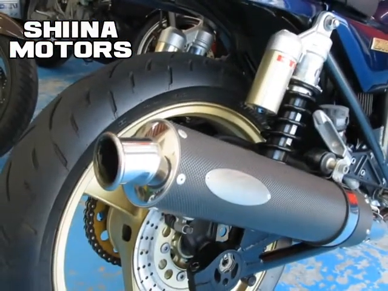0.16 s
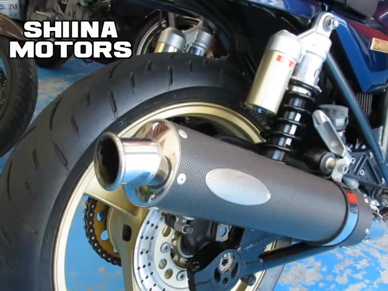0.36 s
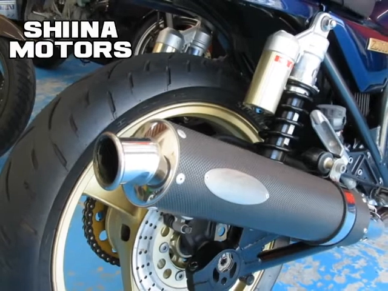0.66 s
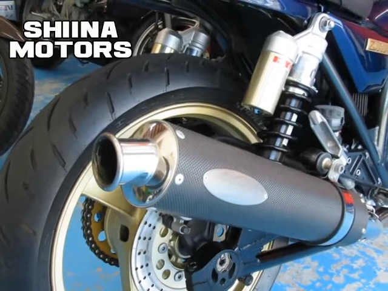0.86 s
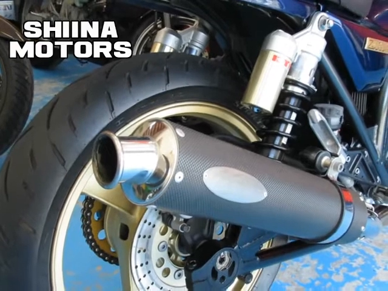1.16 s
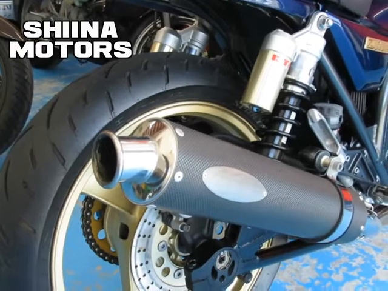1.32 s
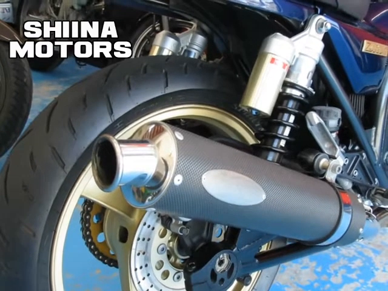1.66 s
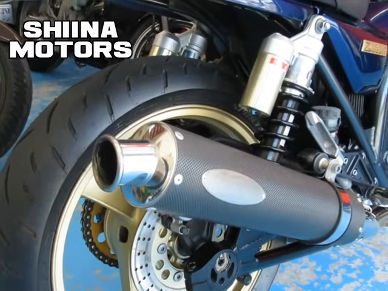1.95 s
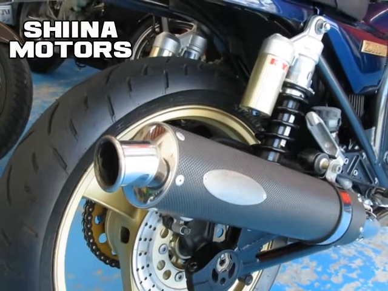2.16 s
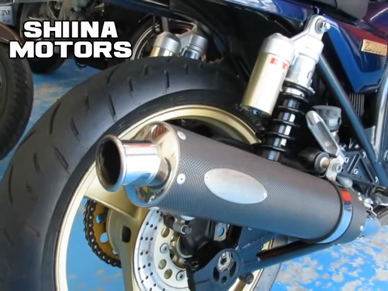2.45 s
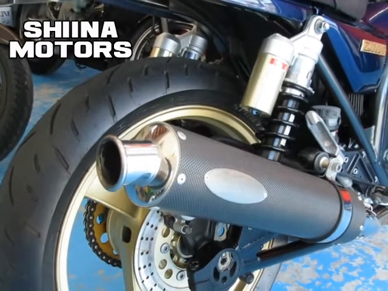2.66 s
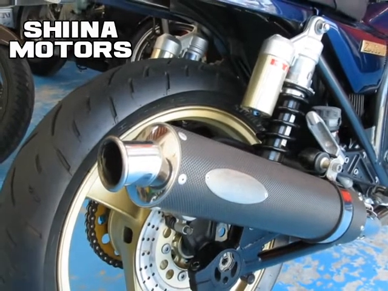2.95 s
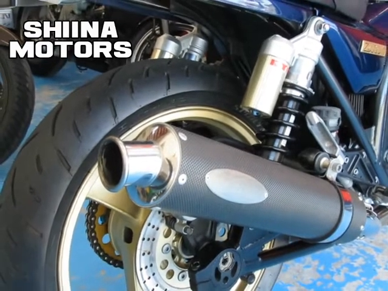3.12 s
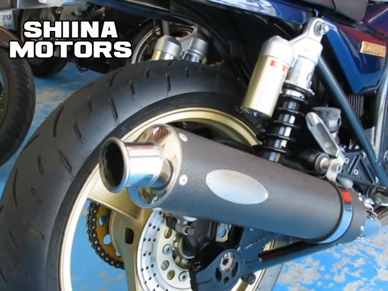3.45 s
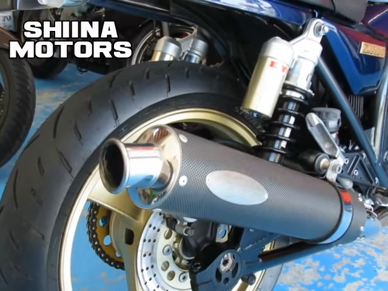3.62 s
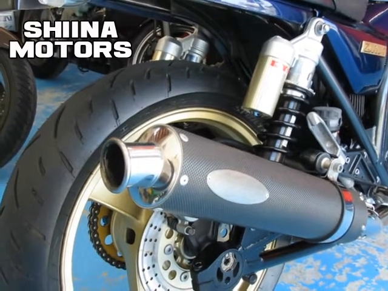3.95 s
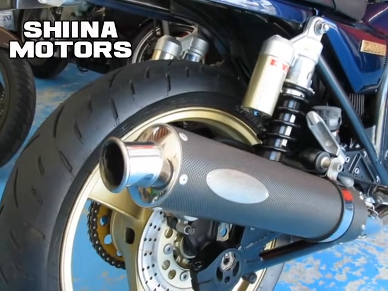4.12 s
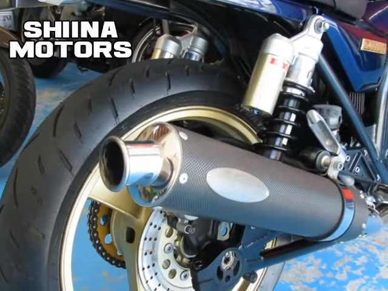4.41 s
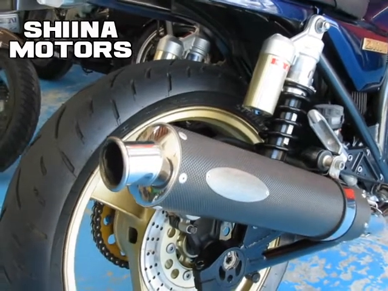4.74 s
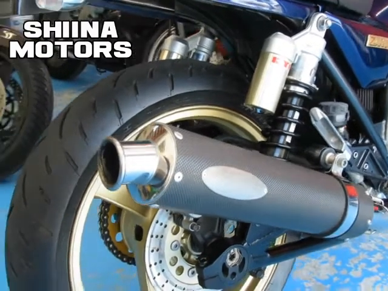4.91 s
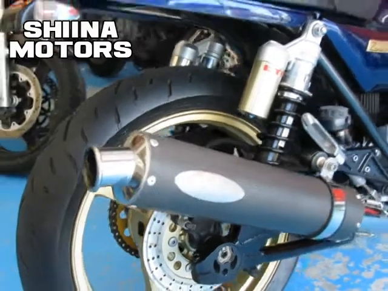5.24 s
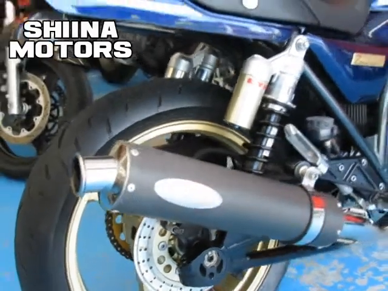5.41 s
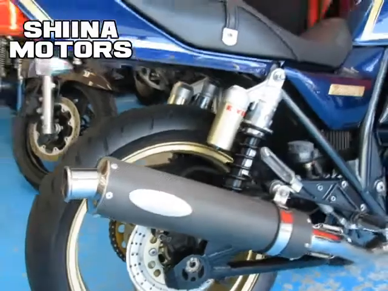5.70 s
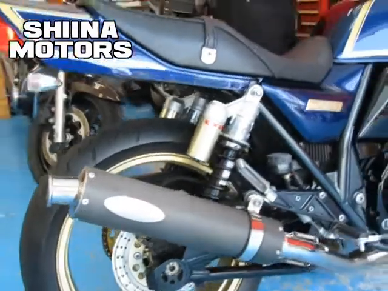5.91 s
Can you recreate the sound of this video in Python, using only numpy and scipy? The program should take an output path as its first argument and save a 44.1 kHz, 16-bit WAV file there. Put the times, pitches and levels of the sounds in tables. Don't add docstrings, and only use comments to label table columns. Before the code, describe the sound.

Close behind a motorcycle's silencer, a dying rev settles into lumpy idle, followed by three raspy revs with crackling pops on the overrun.

```python
import sys
import numpy as np
from scipy import signal
from scipy.fft import rfft, irfft, next_fast_len
from scipy.io import wavfile
from scipy.ndimage import uniform_filter1d, map_coordinates

SR = 44100
rng = np.random.default_rng(int(sys.argv[2]) if len(sys.argv) > 2 else 0)


def transcribe(signal):
    frames = np.atleast_2d(signal).T
    limited = np.clip(frames, -1, 1)
    pcm = np.round(limited * 32767).astype(np.int16)
    wavfile.write(sys.argv[1], SR, pcm)


def decibels_to_gain(level_db):
    exponent = np.asarray(level_db, float) / 20
    return 10 ** exponent


N = 267684

# [t/s, peak level/dB, thud level/dB]
POPS = [
    (1.092, -24, 18),
    (2.949, -27, 14),
    (3.059, -18, -10),
    (4.578, -5, -2),
    (4.797, -25, -11),
    (4.86, -13, 2),
    (4.963, -37, 5),
]
# [f/Hz, width/Hz, level/dB]
PIPE_MODES = [(88.6, 17.2, 11.5), (195, 10, 3), (249, 128, 4.5), (354.4, 65, 0.5)]
# [f/Hz, width/Hz, level/dB]
CAN_MODES = [(683, 111, 1.5), (1131, 101, 5), (1356, 61, 3.5), (1675, 55, -9), (2087, 108, -4.5),
             (2430, 73, -16), (3600, 360, -10.5), (4690, 60, -0.5)]
# [f/Hz, width/Hz, level/dB]
THUD_MODES = [(127, 64, 4)]
# [f/Hz, level/dB per Hz]
SPIT_COLOUR = [(1820, -31), (3100, -21.5), (3650, 2.5), (4290, -19.5), (4710, -6), (5150, -20.5),
               (6790, -12), (7360, -18.5), (7930, -16.5), (8480, -18), (13500, -20.5), (15000, -22),
               (15600, -32)]
# [f/Hz, level/dB per Hz]
HISS_COLOUR = [(310, -2), (520, 3), (732, 1.5), (820, 0), (1170, 1.5), (1620, -4.5), (2630, -4.5),
               (3170, -13), (4520, -14), (7120, -27.5), (12900, -37.5), (14700, -50), (15600, -61)]
# [f/Hz, left-right likeness/0-1]
ALIKE = [(60, 1.0), (150, 1.0), (380, 1.0), (950, 1.0), (2380, 0.97), (5980, 0.8), (15000, 0.5)]
# [f/Hz, left minus right level/dB]
LEAN = [(60, 0.0), (180, 0.0), (550, 0.0), (1650, 0.0), (4970, 0.5), (15000, 0.5)]
# [f/Hz, left's lead/rad]
LEAD = [(40, .005), (100, .02), (300, .02), (700, .02), (1500, .07), (3000, .15), (5600, .6), (10000, .5),
        (15000, .7)]
# [f/Hz, T60/s]
ROOM_DECAY = [(100, 1), (1500, 0.85), (10000, 0.15)]

# [t/s, firing rate f/Hz]
BLIPS = [
    [(0, 100), (.19, 69), (.3, 58)],
    [(.54, 46), (.7, 82), (.8, 116), (.9, 156), (1.0, 189), (1.1, 217), (1.14, 221), (1.26, 187)],
    [(2.43, 46), (2.5, 71), (2.6, 104), (2.66, 134), (2.78, 174), (2.9, 209), (2.95, 213), (3.0, 206)],
    [(4.155, 46), (4.2, 60), (4.3, 92), (4.4, 137), (4.5, 171), (4.6, 198), (4.68, 212), (4.72, 203)],
]
# [opens t/s, shuts t/s, first order drops out t/s]
THROTTLE = [
    (0.51, 1.106, 1.092),
    (2.372, 2.908, 2.92),
    (4.097, 4.628, 4.665),
]
OPEN_S, SHUT_S = 0.13, 0.09
IDLE_HZ, COAST_S = 45.5, .5
LANDING = 8
CATCH_HZ, EVEN_S, IDLE_SCATTER_DB, SETTLE_S = 52, .17, 1.9, 0.9
# [first order level/dB, second order level/dB]
SETTLE_ORDERS_DB = [3.5, 14]
# [thump, bark, spit, hiss level/dB]
SETTLE_GAS_DB = [0.5, 1, 0.5, 6.2]

# [firing rate f/Hz, first order level/dB, second order level/dB]
ORDERS_OPEN = [(46, -25, -20), (65, -27.5, -30.5), (89, -20.5, -29), (113, -17.5, -20), (132, -19.5, -17),
               (186, -33.5, -20.5), (180.6, -21, -14), (216, -30, -24)]
# [firing rate f/Hz, first order level/dB, second order level/dB]
ORDERS_SHUT = [(44.5, -44.5, -36), (53.7, -42.5, -38), (72, -39.5, -48.5), (99, -36.5, -41.5),
               (107, -34.5, -37.5), (130, -35, -42.5), (167, -35, -45.5), (195, -31, -36.5)]
# [firing rate f/Hz, thump, bark, spit, hiss level/dB]
GAS_OPEN = [(45.3, -26.5, -21, -41, -42.5), (70.2, -20, -53, -51, -33.5),
            (81.2, -13.5, -35.5, -50.5, -32.5), (129.5, -10.5, -22, -46, -24.5),
            (163, -20.5, -19, -49, -32), (206, -30, -16, -48, -29.5)]
# [firing rate f/Hz, thump, bark, spit, hiss level/dB]
GAS_SHUT = [(46, -34.5, -59, -72, -47.5), (71.4, -35.5, -59, -73, -46.5), (92.6, -32.5, -50, -74.5, -44.5),
            (124, -33.5, -37, -74, -41), (194, -34, -32, -58.5, -35.5), (232, -49, -35, -55, -26)]
# [firing rate f/Hz, size scatter/dB, turbulence in the bark/0-1]
BURN_OPEN = [(46, 1.5, .75), (110, 1.4, .22), (215, 1.7, .16)]
# [firing rate f/Hz, size scatter/dB, turbulence in the bark/0-1]
BURN_SHUT = [(46, 3.8, .8), (120, 3.6, .85), (210, 2.2, .65)]
# [firing rate f/Hz, loss at 400 Hz/dB]
DULL_OPEN = [(60, 25.5), (125, 12.5), (215, 6)]
# [firing rate f/Hz, loss at 400 Hz/dB]
DULL_SHUT = [(46, 22.8), (55, 22.7), (205, 7.3)]

# [t/s, level/dB]
SURGES = [(.83, 0), (.98, 3), (1.052, 2.5), (1.1, 4), (2.64, 0), (2.72, 3), (2.79, 1.5), (2.84, -0.5),
          (2.91, -0.5), (4.382, -0.5), (4.46, 1.5), (4.532, 3), (4.62, 2.5)]
SURGE_SHARE = [0.85, 1.2, 0.87, 2.4]
# [t/s, level/dB]
MISSES = [(.15, -4), (.22, -5), (.31, 0.5), (.475, -11), (1.45, -1), (1.83, -10), (1.96, -10), (2.065, -9),
          (3.22, 0), (3.36, -5), (3.48, 0), (3.75, -8), (3.865, -2.5), (4.572, -0.5), (5.125, -8),
          (5.25, -4), (5.45, -3), (5.56, -8)]
SURGE_S, MISS_S = 0.012, .015
# [t/s, hiss level/dB, pipe level/dB]
ANGLE = [
    (0, 4, 2.5),
    (.5, 0.08, -0.64),
    (5.3, 0.5, -0.6),
    (5.6, -1.5, -4),
    (6.07, 1.5, -3),
]

DROP_S, DROP_DB = 0.02, -31
STUMBLE_PER_S, STUMBLE_DEPTH = 16, 1.2
DIP_LOW_HZ, DIP_HIGH_HZ, DIP_DB, DIP_LATE_S = 650, 2800, -6, .00017
WALL_S, WALL_HZ, WALL_WIDTH_HZ, WALL_DB = 0.0108, 355, 87, -24
CONTROL_STEP = 64


def unit(x):
    return x / np.sqrt(np.mean(x ** 2) + 1e-20)


def slow_rms(x):
    power = uniform_filter1d(uniform_filter1d(x ** 2, size=4000), size=4000)
    return np.sqrt(np.abs(power) + 1e-20)


def along(points, hz):
    f, v = np.transpose(points)
    return np.interp(np.log(hz + 1), np.log(f + 1), v)


def filtered(x, response):
    m = next_fast_len(N + SR // 2)
    return irfft(rfft(x, m) * response(np.fft.rfftfreq(m, 1 / SR)), m)[..., :N]


def resonances(modes):
    return lambda f: sum(decibels_to_gain(db) * 1j * f * w / (c * c - f * f + 1j * f * w) for c, w, db in modes)


def steep(hz):
    b, a = signal.butter(8, hz, analog=True)
    return lambda f: signal.freqs(b, a, worN=np.ravel(f))[1].reshape(np.shape(f))


def stereo_noise(colour):
    points = [(colour[0][0] / 2, -60)] + colour

    def mid_side(hz):
        turn = np.arccos(np.clip(along(ALIKE, hz), -1, 1)) / 2
        return decibels_to_gain(along(points, hz)) * [np.cos(turn), np.sin(turn)]

    mid, side = filtered(rng.standard_normal((2, N)), mid_side)
    return unit(np.array([mid + side, mid - side]))


def patchy(x, depth_db):
    z = signal.stft(x, nperseg=256)[2]
    field = uniform_filter1d(rng.standard_normal(z.shape[1:]), size=7, axis=0)
    field = uniform_filter1d(field, size=3, axis=1)
    return unit(signal.istft(z * decibels_to_gain(depth_db * unit(field)), nperseg=256)[1][:, :N])


def clock():
    return np.arange(0, N + CONTROL_STEP, CONTROL_STEP) / SR


def filled(rows):
    return np.array([np.interp(np.arange(N) / SR, clock(), row) for row in rows])


def bumps(events, width_s):
    return sum(db * np.exp(-((clock() - s) / width_s) ** 2) for s, db in events)


def speed():
    t = clock()
    free, idle_s, pulling = np.zeros(len(t)), np.zeros(len(t)), np.zeros(len(t))
    for blip in BLIPS:
        s, hz = np.transpose(blip)
        coast = np.exp(-np.maximum(t - s[-1], 0) / COAST_S)
        free = np.where(t >= s[0], np.interp(t, s, hz) * coast, free)
        caught = s[-1] + COAST_S * np.log(hz[-1] / CATCH_HZ)
        idle_s = np.where(t >= s[np.argmax(hz) // 2], np.maximum(t - caught, 0), idle_s)
        pulling += (t >= s[0]) * (t < s[-1])
    landed = (free ** LANDING + IDLE_HZ ** LANDING) ** (1 / LANDING)
    return np.where(pulling, free, landed), idle_s


def by_throttle(opened, shut, idle_db=0):
    t = clock()
    rate, idle_s = speed()
    grip = 0
    for opens, shuts, _ in THROTTLE:
        ramp = np.minimum((t - opens) / OPEN_S, 1 + (shuts - t) / SHUT_S)
        grip = grip + np.clip(ramp, 0, 1)

    def read(rows):
        hz, *columns = np.transpose(rows)
        return np.array([np.interp(rate, hz, column) for column in columns])

    settled = np.reshape(idle_db, (-1, 1)) * (1 - np.exp(-idle_s / SETTLE_S))
    return grip * read(opened) + (1 - grip) * (read(shut) + settled)


def angle_db():
    s, *gains = np.transpose(ANGLE)
    return [np.interp(clock(), s, g) for g in gains]


def orders_db():
    drop_db = bumps([(s, DROP_DB) for *_, s in THROTTLE], DROP_S)
    levels = by_throttle(ORDERS_OPEN, ORDERS_SHUT, SETTLE_ORDERS_DB)
    return filled(levels + angle_db()[1] + [drop_db, 0 * drop_db])


def gas_db():
    rush_db, pipe_db = angle_db()
    levels = by_throttle(GAS_OPEN, GAS_SHUT, SETTLE_GAS_DB)
    surged = levels + np.outer(SURGE_SHARE, bumps(SURGES, SURGE_S))
    return filled(surged + [pipe_db, rush_db, pipe_db, rush_db])


def burn():
    scatter_db, turbulence = by_throttle(BURN_OPEN, BURN_SHUT)
    even = np.clip(speed()[1] / EVEN_S, 0, 1)
    evened = scatter_db + even * (IDLE_SCATTER_DB - scatter_db)
    return filled([np.minimum(scatter_db, evened), turbulence])


def stumble(scatter_db):
    draws = rng.standard_normal(N * STUMBLE_PER_S // SR + 4)
    chance = map_coordinates(draws, [np.arange(N) * STUMBLE_PER_S / SR])
    sag = np.minimum(chance, .6 * chance) - .05 * scatter_db + .3
    return decibels_to_gain(STUMBLE_DEPTH * scatter_db * sag)


def missed():
    return decibels_to_gain(filled([bumps(MISSES, MISS_S)])[0])


def thump(rate, turns, size, kicks):
    pipe = lambda f: resonances(PIPE_MODES)(f) * steep(455)(f)
    soft_pipe = lambda f: pipe(f) * decibels_to_gain(-20 * f / 400)
    above = lambda f: (1j * f / (1j * f + 110)) ** 2
    order = np.arange(1, 13)[:, None]
    step = 64
    fill = lambda row: np.interp(np.arange(N), np.arange(0, N, step), row)
    dull_db, = filled(by_throttle(DULL_OPEN, DULL_SHUT))
    scatter_db = burn()[0]

    hz = order * rate[::step]
    strength = 2 * rate[::step] / SR * np.abs(pipe(hz)) * decibels_to_gain(-dull_db[::step] * hz / 400)
    norm = np.sqrt(np.sum(strength ** 2 / (1 + (130 / hz) ** 4), axis=0) / 2)
    lag = np.unwrap(np.angle(pipe(hz)), axis=1)
    wave = [np.cos(2 * np.pi * k * turns + fill(angle)) for k, angle in zip(order[:, 0], lag)]
    upper = sum(fill(row / norm) * partial for row, partial in zip(strength[2:], wave[2:]))

    soft = np.clip(dull_db / 20, 0, 1)
    ring = lambda x: (1 - soft) * filtered(x, pipe) + soft * filtered(x, soft_pipe)
    ragged = ring(filtered(kicks, above)) / fill(norm)
    burble = ring(filtered(size * rng.standard_normal(N), above))
    share = np.clip(scatter_db / 5.6, 0, 1) ** 2
    rest = np.sqrt(1 - share) * (upper + .6 * ragged) + np.sqrt(share) * burble / slow_rms(burble)

    stumbles = [stumble(scatter_db), stumble(scatter_db)]
    first, second = np.sqrt(2) * decibels_to_gain(orders_db()) * size ** .6 * stumbles
    return first * wave[0] + second * wave[1] + decibels_to_gain(gas_db()[0]) * rest


def silencer(f):
    packing = (4000 / (4000 + 1j * f)) ** 4
    chamber = (520 ** 2 - f ** 2 + 1j * f * 40) / (520 ** 2 - f ** 2 + 1j * f * 400)
    return resonances(CAN_MODES)(f) * packing * chamber


def front_path(f):
    band = np.exp(-(f / DIP_HIGH_HZ) ** 2) * f ** 4 / (f ** 4 + DIP_LOW_HZ ** 4)
    return silencer(f) + decibels_to_gain(DIP_DB) * band * np.exp(-2j * np.pi * f * DIP_LATE_S)


def bark(turns, firing, luck, size, since):
    scatter_db, turbulence = burn()
    even = np.diff(firing, prepend=firing[0]).astype(float)
    jitter = .016 * np.interp(turns + .5, np.arange(len(luck)), luck[:, 2])
    front = (turns + jitter).astype(int)
    strength = decibels_to_gain(scatter_db * luck[front, 0] + 2.2 * luck[front, 1])
    fronts = np.diff(front, prepend=front[0]) * strength
    shock = filtered(-fronts, front_path) / slow_rms(filtered(even, front_path))
    gust = filtered(rng.standard_normal(N) * size * (.4 + np.exp(-since / .003)), silencer)
    share = np.clip(turbulence, 0, 1)
    return np.sqrt(1 - share) * shock + np.sqrt(share) * gust / slow_rms(gust)


def spit(rate, firing, luck, size, since):
    strength = size * decibels_to_gain(luck[firing, 1] + 2.5 * luck[firing, 2])
    pulse = np.exp(-since / .0012) * (1 - np.exp(-since / .0003))
    puff = strength * pulse + .04 + rate / 1000
    return puff / slow_rms(puff) * patchy(stereo_noise(SPIT_COLOUR), depth_db=4)


def exhaust():
    rate = filled(speed())[0]
    _, bark_db, spit_db, _ = gas_db()
    scatter_db = burn()[0]
    turns = np.cumsum(rate) / SR + .25
    firing = turns.astype(int)
    luck = np.clip(rng.standard_normal((firing[-1] + 2, 3)), -1.8, 1.5)
    size = decibels_to_gain(scatter_db * luck[firing, 0])
    since = (turns - firing) / rate

    even = np.diff(firing, prepend=firing[0]).astype(float)
    late = .004 * scatter_db ** 2 * np.interp(turns, np.arange(len(luck)), luck[:, 2])
    eased = uniform_filter1d(size, size=400)
    body = missed() * thump(rate, turns + late, eased, even * (size - 1))
    body = body + decibels_to_gain(bark_db - 3.5) * bark(turns, firing, luck, size, since)
    return body, decibels_to_gain(spit_db + 9.5) * spit(rate, firing, luck, size, since)


def hiss():
    flutter = map_coordinates(rng.standard_normal(N // 600 + 4), [np.arange(N) / 600])
    rush = patchy(stereo_noise(HISS_COLOUR), depth_db=2.06)
    low = filtered(rush, lambda f: 1 / (1 + (f / 1500) ** 4))
    thin = 1 - decibels_to_gain(-10 * filled(speed())[0] / 200)
    return decibels_to_gain(gas_db()[3] + 0.31 * flutter) * (rush - thin * low)


def rumble():
    deep = filtered(rng.standard_normal(N), resonances([(43.2, 25, 0)]))
    return decibels_to_gain(0.26 * orders_db()[0] - 43.0) * unit(filtered(deep, steep(180)))


def wall(x):
    ring = resonances([(WALL_HZ, WALL_WIDTH_HZ, WALL_DB)])
    return filtered(x, lambda f: ring(f) * np.exp(-2j * np.pi * f * WALL_S)) * [[1], [-1]]


def shop(x):
    hz, t, z = signal.stft(rng.standard_normal((2, SR // 2)), SR, nperseg=256)
    turn = np.arccos(np.clip(along(ALIKE, hz), -1, 1))[:, None] / 2
    mid, side = np.cos(turn) * z[0], np.sin(turn) * z[1]
    decay = decibels_to_gain(-60 * t / along(ROOM_DECAY, hz)[:, None])
    tail = signal.istft(np.array([mid + side, mid - side]) * decay, SR, nperseg=256)[1]
    delayed = np.pad(x, ((0, 0), (300, 0)))
    return signal.fftconvolve(delayed, tail / np.linalg.norm(tail[0]), axes=1)[:, :N]


def pops():
    thud, burst = np.zeros(N), np.zeros(N + SR)
    t = np.arange(SR // 20) / SR
    for s, db, thud_db in POPS:
        start = round(s * SR)
        thud[start] = decibels_to_gain(db + thud_db + 27)
        burst[start:start + len(t)] += decibels_to_gain(db + 8 - 60 * t / .03) * rng.standard_normal(len(t))
    return filtered(thud, resonances(THUD_MODES)) + filtered(burst[:N], silencer)


def scene():
    body, outlet = exhaust()
    near = body + pops() + outlet
    room = filtered(shop(near), lambda f: f ** 2 / (f ** 2 + 600 ** 2))
    heard = near + decibels_to_gain(-11) * room + wall(body) + hiss() + rumble()
    half = np.array([[.5], [-.5]])
    return filtered(heard, lambda f: decibels_to_gain(half * along(LEAN, f)) * np.exp(1j * half * along(LEAD, f)))


def roll_off(x):
    return signal.sosfilt(signal.butter(12, 15730, fs=SR, output="sos"), x)


def record(dry):
    edge = lambda f: np.where(f < 15150, 1, .2) * (f < 15730)
    return roll_off(filtered(dry, edge))


dry = scene()
out = record(dry)
transcribe(out)
```